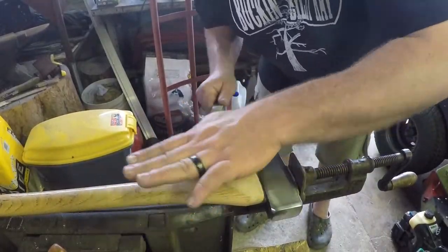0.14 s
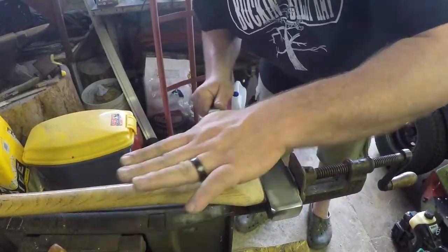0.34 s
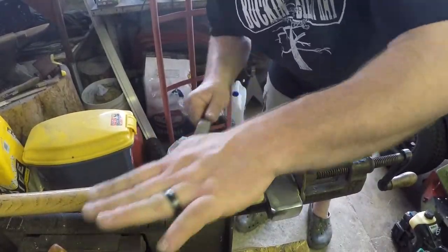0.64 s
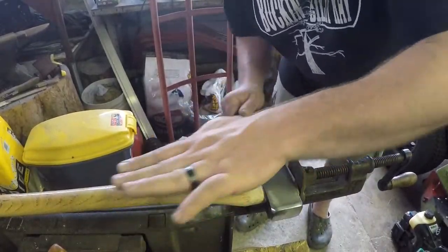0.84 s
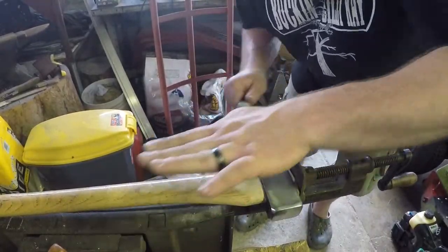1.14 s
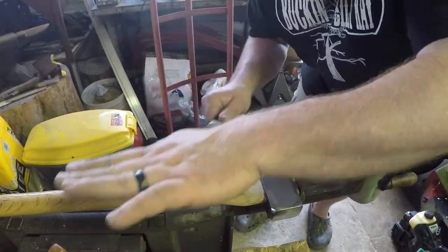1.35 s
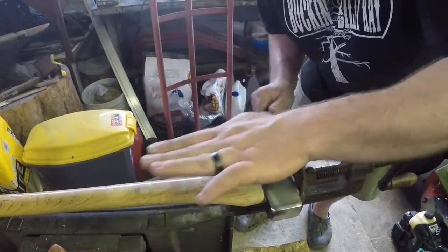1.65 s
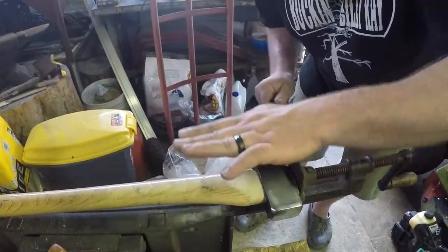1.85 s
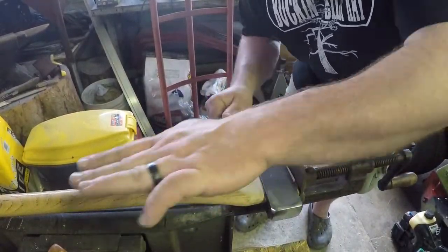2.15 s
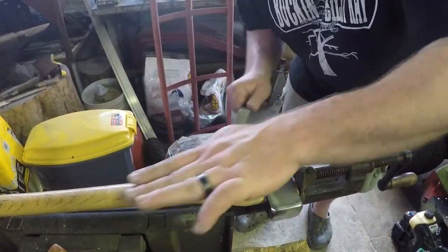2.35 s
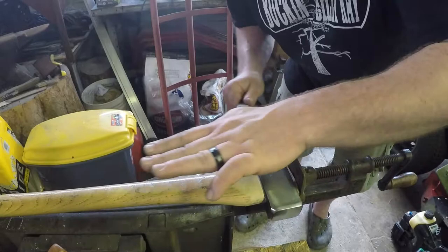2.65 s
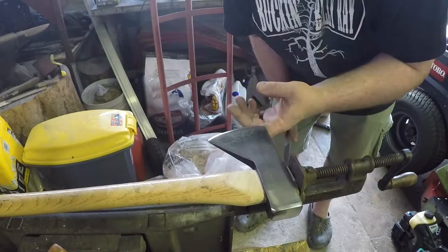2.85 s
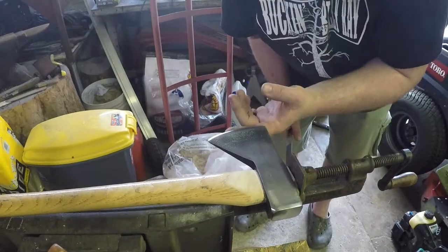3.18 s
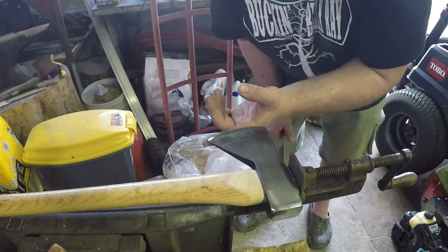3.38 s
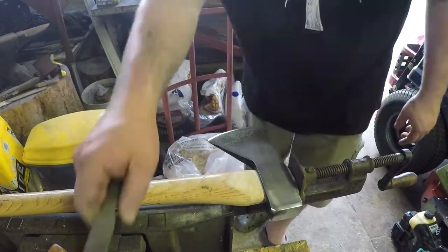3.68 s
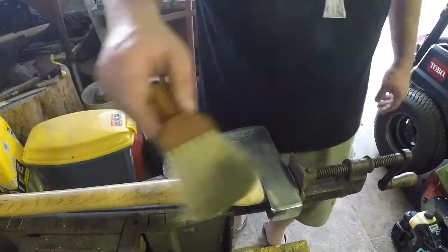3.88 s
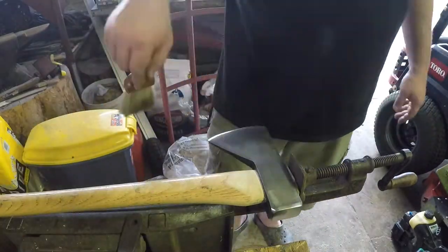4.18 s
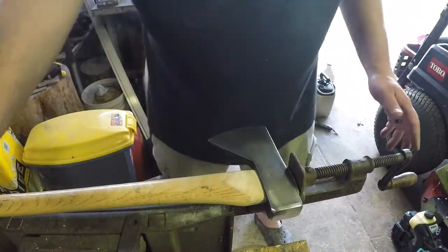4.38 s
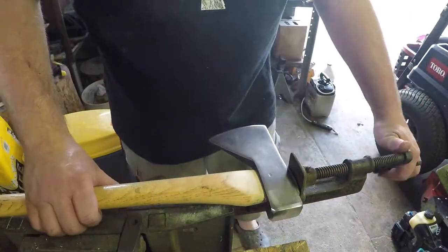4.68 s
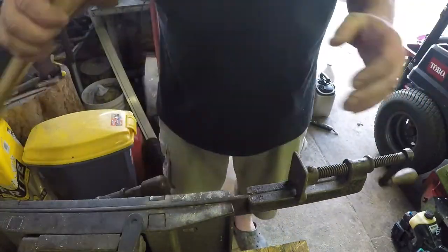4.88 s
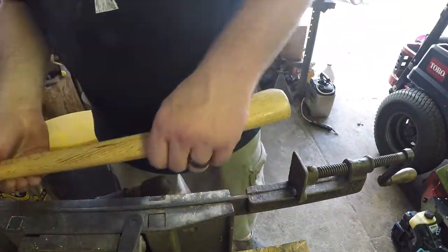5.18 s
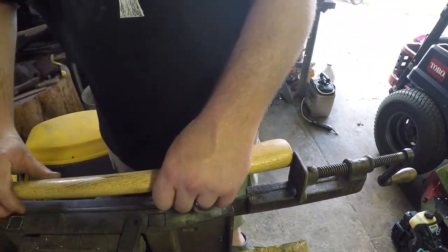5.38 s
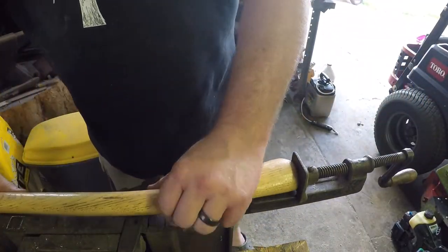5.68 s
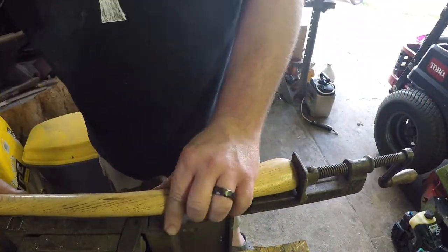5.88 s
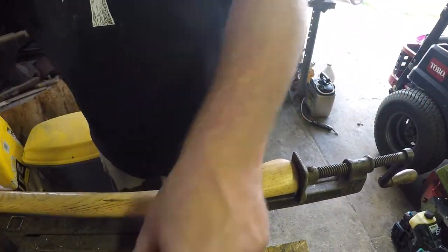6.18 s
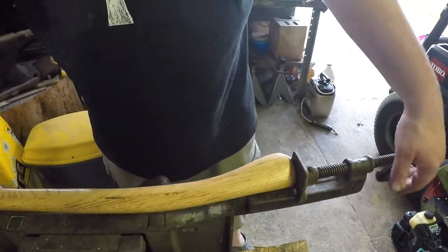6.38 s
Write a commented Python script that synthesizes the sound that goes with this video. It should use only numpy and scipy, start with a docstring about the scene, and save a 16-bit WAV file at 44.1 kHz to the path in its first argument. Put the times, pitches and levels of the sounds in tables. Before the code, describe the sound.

From 0 to about 2.8 s a file is pushed over a clamped steel axe head in quick even strokes, roughly nine a second: each lands with a bright hard tick, then a very short gritty rasp and damped metallic ring, growing slightly raspier, with occasional snags. Near quiet follows, only low workshop rumble, faint hiss and a little cloth rustle. At 3.7-3.85 s the file is laid down with a loud, rattling metal clatter. Soft bristle and cloth swishes run from 3.9 to 4.4 s. A sharp lever clank hits at 4.48 s, then woody knocks around 4.75-5 s, rubbing at 4.9-5.3 s, and a thud-like knock at 5.62 s. A brief squeak comes near 5.9 s, thread scrapes at 6.05 and 6.19 s with another tiny squeak, a hard metallic double clack at 6.22 s, and light ticks to 6.5 s. Close microphone, short dry reflections.

```python
"""A file is pushed in quick strokes over a steel axe head clamped in a vise: it lands with a tick, bites and lifts.
Landing and cutting force drive the damped modes of axe, file and vise; grit adds a hiss.
Then the file is laid down on the bench with a clatter, bristles swish, and the vise and the wooden handle knock
and rub: short blows and friction noise excite the same steel, and two squeaks are tones with overtones.
A faint rustle, short reflections and low rumble surround the work in a small cluttered workshop.
"""
import sys
import numpy as np
from scipy import signal
from scipy.fft import rfft, irfft, next_fast_len
from scipy.io import wavfile
from scipy.ndimage import uniform_filter1d

SR = 44100
rng = np.random.default_rng(int(sys.argv[2]) if len(sys.argv) > 2 else 0)


def transcribe(u):
    """Save the signal u as a 16-bit wav file named by the first command-line argument.

    u: samples, shape (n,) or (channels, n), limited to [-1, 1]; the rate is SR.
    q: integer samples, one column per channel.
    """
    v = np.clip(np.atleast_2d(u).T, -1, 1)
    q = np.round(v * 32767).astype(np.int16)
    wavfile.write(sys.argv[1], SR, q)


N = 287973

# File strokes. Each row: start in seconds, landing peak in dB, level the bite swells to in dB, length in seconds.
STROKES = [(0.0004, -4.5, -44.5, 0.046), (0.1065, -7, -36.5, 0.03), (0.2114, -5, -32.5, 0.044),
           (0.3145, -7, -36.5, 0.045), (0.4196, -6, -32.5, 0.041), (0.5239, -4, -34, 0.049),
           (0.634, -12.5, -32, 0.056), (0.7563, -5.5, -32, 0.053), (0.8684, -6, -34.5, 0.063),
           (0.9793, -7, -33.5, 0.096), (1.1072, -11, -32.5, 0.062), (1.228, -9, -36, 0.056),
           (1.344, -9.5, -33.5, 0.05), (1.4519, -11.5, -35.5, 0.058), (1.5675, -8, -36.5, 0.059),
           (1.6815, -7, -33, 0.053), (1.7988, -8, -38, 0.047), (1.9092, -5, -37, 0.055),
           (2.0182, -9, -36.5, 0.061), (2.142, -6.5, -34.5, 0.052), (2.2568, -8, -37, 0.057),
           (2.37, -7.5, -33.5, 0.059), (2.4897, -9.5, -32, 0.057), (2.604, -10.5, -33.5, 0.048),
           (2.7187, -5.5, -43.5, 0.052)]
# The file snags on the edge. Each row: start in seconds, relative peak in dB.
SNAGS = [(0.0446, -12), (0.1458, -8.5), (1.0164, -17), (1.062, -32), (1.0636, -9.5), (2.7566, -13)]
# Modes of axe, file and vise together. Each row: frequency in Hz, least width in Hz, relative level in dB.
STEEL = [(74, 4.4, 4.5), (157, 8.5, 3), (341.2, 16, 0), (515.3, 25.7, 1.5), (598.6, 32, 0.5),
         (636.6, 44, 4), (754.5, 64, -0.5), (900, 21, -1.5), (1204, 61, -10), (1338, 40, -9.5),
         (1507, 46, -12.5), (1689.5, 30, -1.5), (1880, 82, -3.5), (2057, 70, 1.5), (2420, 120, -4),
         (2795, 28, -0.5), (3200, 125, -5), (3850, 63, -2.5), (4788, 65, -3.5), (5400, 120, -14.5),
         (5740, 110, -8.5), (6320, 80, -7.5), (7810, 120, -9.5), (8350, 53, -5), (9130, 190, -6.5),
         (11100, 160, -3.5)]
# Spectrum of the landing tick. Each row: frequency in Hz, relative level in dB.
LANDING = [(1300, -24), (2400, -8), (3800, -29), (4950, -1.5), (6500, -25.5), (7700, -6.5), (10600, -2.5),
           (13900, -4), (15300, 1.5), (16100, -7)]
# Spectrum of the grit hiss. Each row: frequency in Hz, relative level in dB.
GRIT = [(4000, -14), (7000, -9), (9000, -19.5), (10300, -3.5), (11500, 1), (13500, -0.5), (15700, 2.5),
        (16100, -39)]
# What is struck. Each holds: bass of the blow in dB, its treble in dB, drive of the steel in dB against the blow.
# FILE is the file laid down on the bench.
FILE, LEVER, SCREW = (-5.5, -8, -11.5), (-4.5, -2.1, -8), (-4.5, -10.5, -7.5)
HANDLE, JAWS = (1, 2.3, 0.67), (6, -11, 1)
# Each row: start in seconds, peak of the blow in dB, clatter decay to -60 dB in seconds (4 ms at least),
# centre of the ring in Hz, what is struck.
KNOCKS = [
    (3.716, -42.5, 0.033, 719, FILE), (3.7433, -37, 0.018, 501, FILE), (3.762, -5, 0.055, 3200, FILE),
    (3.7655, -31, 0.03, 3100, FILE), (3.8147, -1.5, 0.026, 1960, FILE), (3.8255, -11, 0.024, 7800, FILE),
    (3.8319, -10, 0.043, 3200, FILE), (3.8397, -12.5, 0.11, 3200, FILE),
    (4.477, -26, 0.03, 2420, JAWS), (4.4833, 1.5, 0.023, 4200, LEVER), (4.4864, -8, 0.047, 786, LEVER),
    (4.6169, -59, 0.03, 2400, JAWS), (4.6394, -43.5, 0.03, 2420, JAWS), (4.722, -42, 0.04, 2420, JAWS),
    (4.7321, -34, 0.028, 2420, JAWS), (4.7658, -33, 0.12, 660, HANDLE), (4.7997, -27.5, 0.11, 710, HANDLE),
    (4.8403, -14.5, 0.091, 900, HANDLE), (4.899, -45, 0.025, 2420, JAWS), (4.9153, -47, 0.03, 732, HANDLE),
    (4.931, -32, 0.036, 720, HANDLE), (4.9586, -29.5, 0.033, 522, HANDLE), (4.9777, -30, 0.06, 807, HANDLE),
    (5.082, -41, 0.053, 2410, SCREW), (5.247, -25, 0.11, 2500, JAWS), (5.468, -34.5, 0.048, 1190, JAWS),
    (5.4962, -29, 0.048, 525, HANDLE), (5.5854, -39, 0.04, 2430, JAWS), (5.6057, -34, 0.037, 541, JAWS),
    (5.6188, -13, 0.024, 2400, HANDLE), (5.7523, -42.5, 0.034, 1950, JAWS), (5.8247, -31, 0.076, 1680, JAWS),
    (5.9439, -40, 0.03, 666, HANDLE), (6.0718, -27, 0.053, 514, SCREW), (6.1702, -19.5, 0.064, 3200, SCREW),
    (6.1774, -16.5, 0.056, 3830, SCREW), (6.2163, 0, 0.011, 2370, SCREW), (6.2279, -4, 0.032, 3250, SCREW),
    (6.2347, -19, 0.021, 1930, SCREW), (6.3882, -24.5, 0.015, 3880, HANDLE), (6.4279, -33, 0.03, 2060, HANDLE),
    (6.4973, -26, 0.033, 650, HANDLE), (6.5244, -24, 0.054, 3870, SCREW)]
# What rubs. Each holds: centre of the friction noise in Hz, drive of the steel in dB against it,
# centre of the ring in Hz.
CLOTH, BRISTLES, WOOD = (15000, -30, 900), (5500, 9.5, 1400), (4600, 23.6, 840)
THREAD, RAIL, BENCH = (950, 11, 1380), (500, 20, 420), (300, 37, 90)
# Swishes and drags. Each row: middle in seconds, half-span in seconds, level at the middle in dB, what rubs.
SLIDES = [(3.272, 0.035, -64, CLOTH), (3.656, 0.24, -61.5, CLOTH), (3.886, 0.088, -56, BRISTLES),
          (6.252, .07, -63, RAIL), (6.389, .03, -60.5, WOOD), (6.502, 0.037, -67, WOOD),
          (4.016, .05, -59.5, CLOTH), (4.121, 0.066, -64.5, BRISTLES), (4.222, .02, -59.5, CLOTH),
          (4.335, 0.13, -60.5, CLOTH), (4.17, .1, -69, CLOTH), (4.369, 0.034, -69.5, WOOD),
          (4.521, 0.063, -62, WOOD), (4.611, 0.14, -71.5, WOOD), (4.844, 0.059, -64, BENCH),
          (5.3, 0.21, -67.5, BENCH), (5.655, 0.049, -65.5, BENCH), (4.931, 0.082, -53, WOOD),
          (5.26, 0.018, -54, WOOD), (5.291, 0.022, -51, WOOD), (5.58, 0.022, -57, WOOD),
          (5.335, 0.082, -69, THREAD), (5.531, 0.12, -65.5, WOOD), (5.79, 0.043, -60.5, THREAD),
          (5.645, 0.038, -62, RAIL), (6.049, 0.054, -47.5, THREAD), (6.105, 0.023, -60, CLOTH),
          (6.189, 0.031, -43, THREAD), (6.442, 0.065, -67, WOOD)]
# Wood squeaks in the jaws, one list a squeak. Each row: time in seconds, mean pitch in Hz,
# mean level of the fundamental in dB, mean level of the overtones in dB against it.
SQUEAKS = [
    [(5.852, 1630, -64, -40), (5.862, 1636, -41, -38), (5.874, 1584, -45, -29), (5.883, 1580, -35, -31),
     (5.892, 1563, -31.5, -13.5), (5.9, 1604, -32, -30), (5.908, 1635, -44, -20), (5.924, 1650, -67, -18)],
    [(6.186, 1625, -53, -28), (6.199, 1550, -36, -16), (6.208, 1550, -36.5, -19), (6.216, 1557, -28, -9),
     (6.22, 1570, -43, -14)],
]
# Relative strength of the overtones. Each row: multiple of the pitch, level in dB.
OVERTONES = [(2, 4), (3, 5.5), (4, -5), (5, 4.5), (6, 8), (7, 4.5), (8, 3), (9, 0)]
# Extra level of the third multiple. One value a squeak, in dB.
THIRD_DB = [0, 11.5]
# Hands and cloth rustle. Each row: time in seconds, mean level in dB, dull part in dB against the bright part.
RUSTLE = [(2.85, -99, -4), (3.7, -73, 3.5), (4.0, -74.5, 0.5), (4.6, -70.5, 15.5), (5.1, -76, 6),
          (5.699, -73.5, 9), (6.53, -77.5, 9.5)]
# Spectra of the rustle's bright part, dull part and tiny ticks. Each row: frequency in Hz, relative level in dB.
RUSTLE_BRIGHT = [(2000, -13), (4000, -14.5), (8500, 5.0), (12000, -4), (15700, -4.0), (16100, -56.0)]
RUSTLE_DULL = [(250, -15.0), (600, 8.5), (2500, -5), (5000, -15.5), (16000, -49)]
RUSTLE_TICKS = [(3000, -30), (5000, -8), (12000, 5), (16000, -12)]
# Spectrum of the workshop background. Each row: frequency in Hz, relative density in dB per Hz.
AIR = [(15, -59.0), (25, -16.5), (120, 0.5), (157, -2), (291, -8.5), (449, -15), (486, -17.0),
       (1320, -24.0), (2090, -30), (2330, -28.5), (8050, -37), (10500, -35.5), (15800, -37), (16100, -79.5)]

AIR_DB = -52.5  # rms of the background
EDGE_HZ, CEILING = 16800, .95  # band limit; amplitude that soft saturation approaches
SIZE = 2 ** 14  # samples in the transform for the steel
HZ = np.fft.rfftfreq(SIZE, 1 / SR)
MODE_HZ = np.transpose(STEEL)[0]
TOUCH_DB = -41  # every bite moves from this level to its own
BOUNCE_S, BOUNCE_DB = 0.0094, -7.5  # the file rebounds after landing before its teeth catch
LIFT_DB_PER_S = -1500  # pressure is let go quickly
JOLT_DB = -2.5  # the landing's push into the steel, against the tick
HISS_DB, HISS_DB_PER_S = -41, 3  # grit hiss at the first stroke, and its growth as filings gather
DAMP_HZ, DAMP_DB = 6500, 1.5  # the pressed file mutes the modes above this, by dB an octave
RASP_HZ = 5570  # the mode that the teeth excite most unevenly
RASP_DB, RASP_DB_PER_S = -0.5, 3.5  # mean extra drive of the rasp mode at the first stroke, and its growth
RASP_SPREAD_DB = 3.5  # standard deviation of that drive, from stroke to stroke
HELD_HZ = 50  # least mode width while hands hold the work


def gain_of(db):
    """Definition of the decibel: amplitude ratio from level."""
    return 10 ** (np.asarray(db) / 20)


def evened(x):
    """Normalisation to unit rms."""
    return x / np.sqrt(np.mean(x ** 2) + 1e-20)


def read(points, hz):
    """Interpolation of a spectrum along logarithmic frequency."""
    f, value = np.transpose(points)
    return np.interp(np.log(hz + 1), np.log(f + 1), value)


def add(mix, s, sound):
    """Superposition of a sound on the mix from second s, cut at the end."""
    part = mix[round(s * SR):][:len(sound)]
    part += sound[:len(part)]


def colour(x, points):
    """Minimum-phase filtering: the gain alone fixes a causal response, through the Hilbert transform."""
    db = read(points, abs(np.fft.fftfreq(4096, 1 / SR)))
    log_gain = np.log(gain_of(np.maximum(db, -100)))
    taps = np.fft.ifft(np.exp(np.conj(signal.hilbert(log_gain)))).real[:2048]
    return signal.fftconvolve(x, taps)[:len(x)]


def near_hz(hz, centre_hz, slope_db):
    """Selective excitation: level falls by slope_db an octave on both sides of a centre."""
    return -slope_db * abs(np.log2(hz / centre_hz))


def teeth(count, spread_db):
    """Granular contact: dense small impacts whose strength fluctuates slowly by spread_db rms."""
    strength = evened(uniform_filter1d(rng.standard_normal(count), 60))
    return evened(rng.standard_normal(count) * gain_of(spread_db * strength))


def steel(force, share_db, held_hz=0):
    """Modal superposition: damped resonances respond to a force; a grip widens narrow modes to held_hz."""
    hz, width, db = np.transpose(STEEL)[..., None]
    sign = (-1) ** np.arange(len(STEEL))[:, None]  # neighbours move oppositely
    modes = sign / (1 + 2j * (HZ - hz) / np.maximum(width, held_hz))
    # scaled so that white force of rms 1 rings near rms 1 with equal shares
    scale = np.sqrt(np.mean(abs((gain_of(db) * modes).sum(0)) ** 2))
    response = (gain_of(db + share_db[:, None]) * modes).sum(0)
    return irfft(rfft(force, SIZE) * response, SIZE) / scale


def landing_tick(land_db):
    """Impact radiation: a brief contact noise with a weaker tail, coloured by its spectrum."""
    t = np.arange(600) / SR
    contact = (t / .0003) ** 2 * np.exp(-t / .00022)
    tail = .1 * np.exp(-t / .0028) * (t > .0004)
    tick = colour(rng.standard_normal(600) * (contact + tail), LANDING)
    return gain_of(land_db) * tick / abs(tick).max()


def filing():
    """Forced vibration: each stroke ticks, jolts the steel, bites with granular force, hisses and lifts."""
    out, hiss, snags = np.zeros((3, N))
    t = np.arange(round(.14 * SR)) / SR
    for s, db in SNAGS:
        add(snags, s, gain_of(db) * np.exp(-t[:600] / 0.00083))
    for s, land_db, bite_db, length in STROKES:
        lift_db = LIFT_DB_PER_S * np.maximum(t - length, 0)
        catch_db = BOUNCE_DB * np.exp(-(t / BOUNCE_S) ** 2)
        pressure_db = TOUCH_DB + (bite_db - TOUCH_DB) * np.minimum(t / length, 1)
        bite = gain_of(pressure_db + catch_db + lift_db)
        grain = teeth(len(t), 2.6)
        force = (bite + gain_of(-12.5) * snags[round(s * SR):][:len(t)]) * grain
        force[30] += gain_of(land_db + JOLT_DB)
        # the contact point travels along the file, so the modes change their shares during the stroke
        along = np.pi / 2 * np.clip(t / length, 0, 1)
        damp_db = DAMP_DB * np.log2(np.maximum(MODE_HZ / DAMP_HZ, 1))
        rasp_db = rng.normal(RASP_DB + RASP_DB_PER_S * s, RASP_SPREAD_DB)
        rasp_shape = np.exp(-((MODE_HZ / RASP_HZ - 1) / 0.027) ** 2)
        shares_db = rng.normal(0, 2.37, (2, len(MODE_HZ)))
        early_db, late_db = shares_db - damp_db + rasp_db * rasp_shape
        add(out, s, steel(force * np.cos(along), early_db))
        add(out, s, steel(force * np.sin(along), late_db))
        fade_db = -113 * t  # falls by 113 dB a second
        add(hiss, s, gain_of(HISS_DB + HISS_DB_PER_S * s + fade_db + 0.34 * catch_db + lift_db))
        add(out, s, landing_tick(land_db))
    grit = evened(colour(teeth(N, 2.2), GRIT))
    return out + (hiss + gain_of(-11.0) * snags) * grit


def knocks():
    """Impact excitation: a sharp contact and a clatter radiate and drive modes, most near the ring's centre."""
    out, t = np.zeros(N), np.arange(round(.15 * SR)) / SR
    for s, db, t60, ring_hz, (bass_db, treble_db, ring_db) in KNOCKS:
        onset = np.minimum(t / 0.00026, 1)
        clatter = 0.32 * gain_of(-60 * t / max(t60, .004))
        force = rng.standard_normal(len(t)) * onset * (np.exp(-t / 0.00077) + clatter)
        bass = [(150, bass_db - 26.0), (600, bass_db), (1100, bass_db / 2 - 10.5)]
        middle = [(2500, -3), (3800, -2), (5500, -6.0)]
        treble = [(10000, treble_db), (15500, treble_db - 6.0)]
        blow = colour(force, bass + middle + treble)
        share_db = near_hz(MODE_HZ, ring_hz, 6.0) + rng.normal(0, 2.2, len(MODE_HZ))
        add(out, s, gain_of(db) * blow / abs(blow).max())
        add(out, s, gain_of(db + ring_db) * steel(force, share_db, HELD_HZ))
    return out


def slides():
    """Sliding friction: swells of granular noise radiate directly and drive the steel by differing amounts."""
    out, bands = np.zeros(N), np.geomspace(150, 15700, num=12)
    for s, half_span, db, (centre_hz, ring_db, ring_hz) in SLIDES:
        t = np.arange(-half_span, half_span, 1 / SR)
        swell = gain_of(db) * np.exp(-.5 * (t / (0.24 * half_span)) ** 2)
        spectrum = list(zip(bands, near_hz(bands, centre_hz, 2.1))) + [(16100, -70)]
        rub = evened(colour(teeth(len(t), 3.8), spectrum))
        add(out, s - half_span, swell * rub)
        force = swell * teeth(len(t), 1.3)
        share_db = rng.normal(0, 1.5, len(MODE_HZ)) + near_hz(MODE_HZ, ring_hz, 9.3)
        held_hz = HELD_HZ * (ring_hz > 300)  # low rings keep their narrow modes
        add(out, s - half_span, gain_of(ring_db) * steel(force, share_db, held_hz))
    return out


def squeak(rows, third_db):
    """Regular stick-slip: a periodic tone whose overtones follow their own level curve, with random wobble."""
    s, *columns = np.transpose(rows)
    t = np.arange(s[0], s[-1], 1 / SR)
    hz, db, bright_db = (np.interp(t, s, c) for c in columns)
    wobble, flutter = (evened(uniform_filter1d(rng.standard_normal(len(t)), 130)) for _ in range(2))
    turn = 2 * np.pi * np.cumsum(hz * (1 + .006 * wobble)) / SR
    db, bright_db = db + 2.5 * flutter, bright_db + 1.0 * wobble  # the grip is uneven
    over = np.zeros(len(t))
    for k, level_db in OVERTONES:
        over += gain_of(level_db + third_db * (k == 3)) * np.sin(k * turn + k * k)
    return s[0], np.sqrt(2) * gain_of(db) * (np.sin(turn) + gain_of(bright_db) * over)


def rustle():
    """Random micro-impacts: fine crackle that swells, with a bright and a dull part and sparse tiny ticks."""
    s, db, dull_db = np.transpose(RUSTLE)
    t = np.arange(N) / SR
    bright = evened(colour(teeth(N, 2.2), RUSTLE_BRIGHT))
    dull = evened(colour(teeth(N, 3.0), RUSTLE_DULL))
    slow = signal.butter(2, 12, fs=SR, output="sos")
    swell_db = 5.8 * evened(signal.sosfilt(slow, rng.standard_normal(N)))
    size = gain_of(5.5 * np.minimum(rng.exponential(1, N), 4))
    ticks = size * (rng.random(N) < 14 / SR)  # about 14 a second
    bright = bright + gain_of(16.0) * colour(ticks, RUSTLE_TICKS)
    level_db = np.interp(t, s, db, left=-90) + swell_db
    return gain_of(level_db) * (bright + gain_of(np.interp(t, s, dull_db)) * dull)


def workshop(x):
    """Reverberation: short dense reflections from bench and shelves, treble dying first."""
    t = np.arange(round(.2 * SR)) / SR
    present = rng.random(len(t)) < .15
    taps = rng.choice([-1., 1.], len(t)) * present * np.minimum(t / 0.00049, 1)
    low = signal.lfilter(*signal.butter(2, 1000, fs=SR), taps)
    # seconds to fall by 60 dB: 0.15 for the low part, 0.089 for the rest
    tail = low * gain_of(-60 * t / 0.15) + (taps - low) * gain_of(-60 * t / 0.089)
    return signal.fftconvolve(x, tail / np.linalg.norm(tail))[:N]


def background():
    """Stationary shaped noise: low workshop rumble over faint hiss."""
    size = next_fast_len(N)
    gain = gain_of(read(AIR, np.fft.rfftfreq(size, 1 / SR)))
    air = irfft(rfft(rng.standard_normal(size)) * gain, size)[:N]
    return gain_of(AIR_DB) * evened(air)


def scene():
    """Superposition of the near sources, their reflections, the rustle and the background."""
    near = filing() + knocks() + slides()
    for rows, third_db in zip(SQUEAKS, THIRD_DB):
        add(near, *squeak(rows, third_db))
    # the near sounds carry no deep bass below about 55 Hz
    near = signal.sosfilt(signal.butter(2, 55, "high", fs=SR, output="sos"), near)
    return (near + gain_of(-7.5) * workshop(near) + rustle() + background())[None]


def record(dry):
    """Soft saturation rounds the loudest peaks; then the top treble steps down, and the band is limited."""
    top = signal.firwin2(511, [0, 15750, 16050, 16600, SR / 2], [1, 1, .3, .2, 0], fs=SR)
    edge = signal.firwin(511, EDGE_HZ, window=("kaiser", 10), fs=SR)
    loud = CEILING * np.tanh(dry / CEILING)
    return signal.oaconvolve(loud, np.convolve(top, edge)[None], "same")


dry = scene()
out = record(dry)
transcribe(out)
```